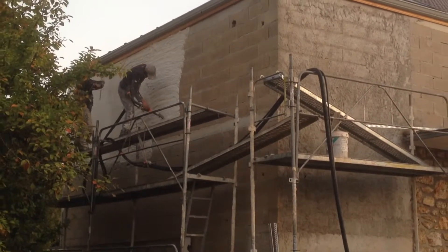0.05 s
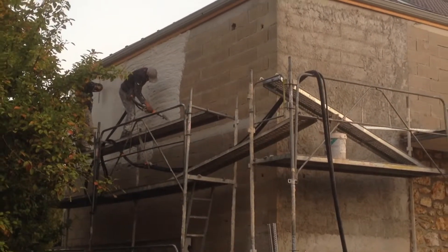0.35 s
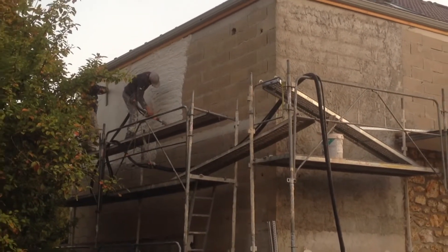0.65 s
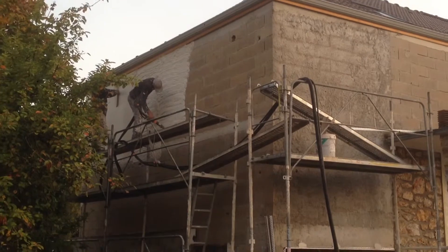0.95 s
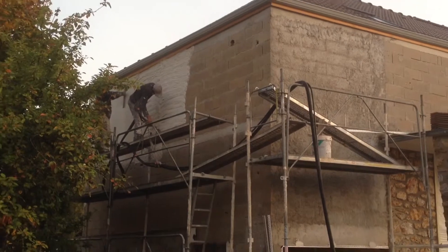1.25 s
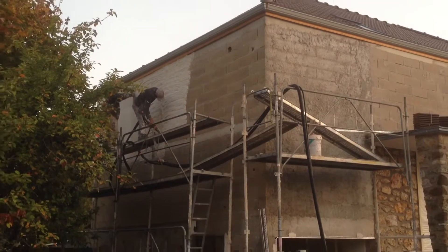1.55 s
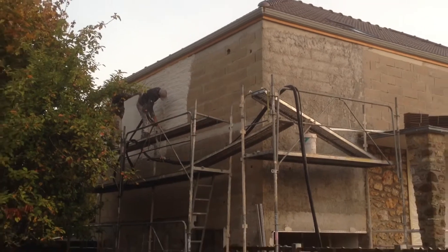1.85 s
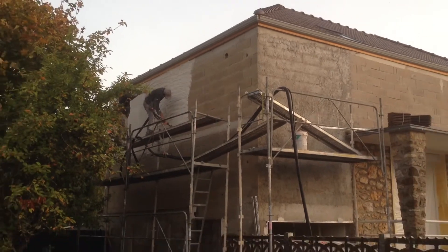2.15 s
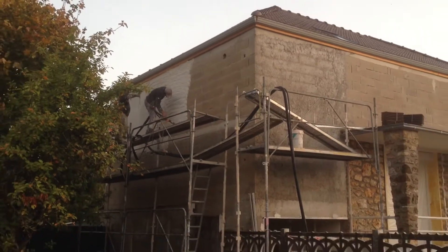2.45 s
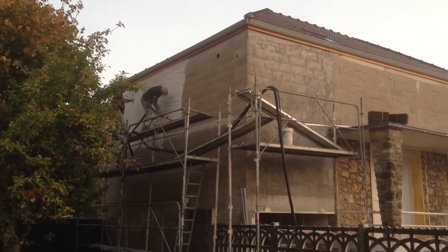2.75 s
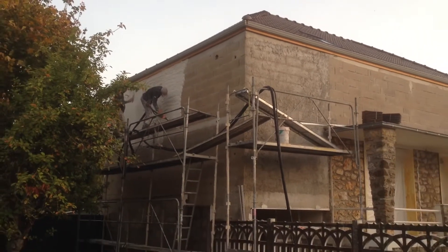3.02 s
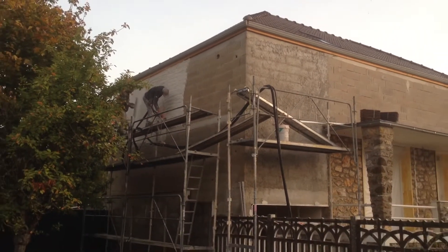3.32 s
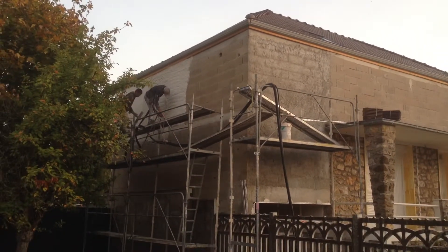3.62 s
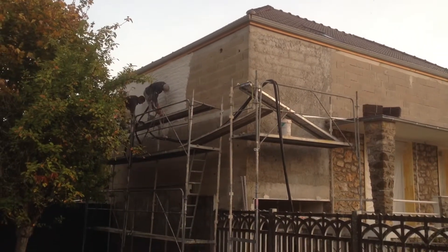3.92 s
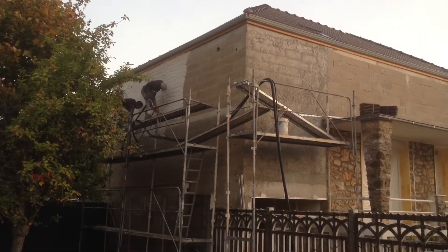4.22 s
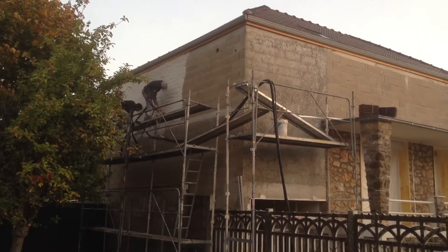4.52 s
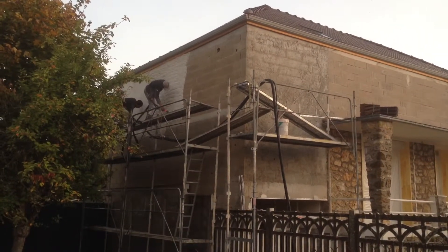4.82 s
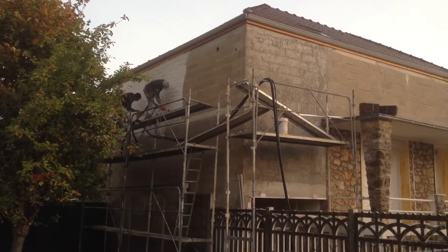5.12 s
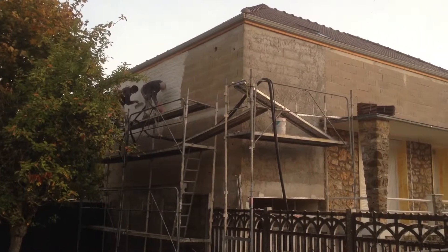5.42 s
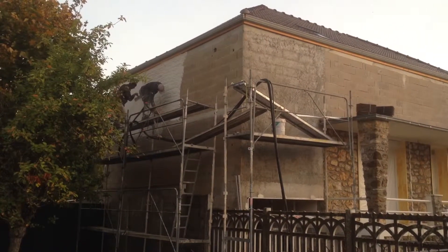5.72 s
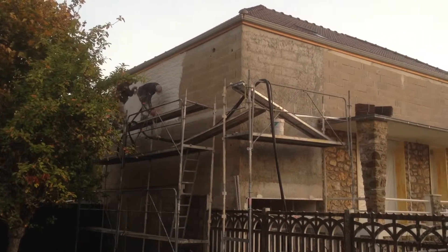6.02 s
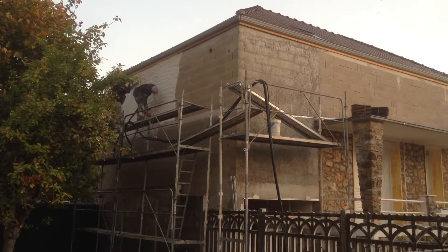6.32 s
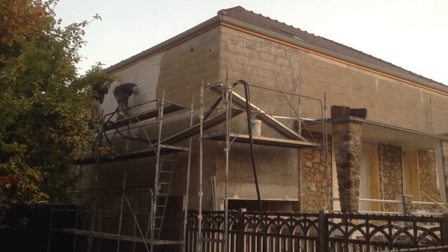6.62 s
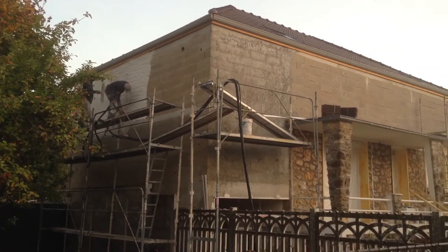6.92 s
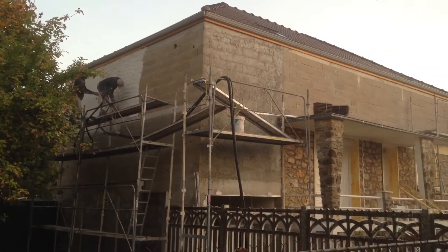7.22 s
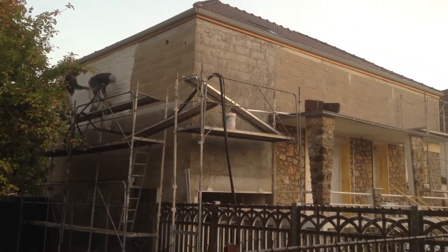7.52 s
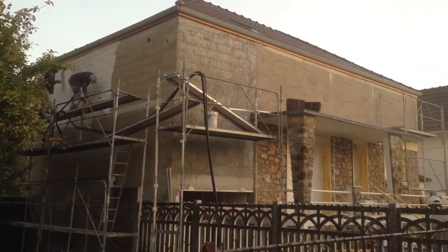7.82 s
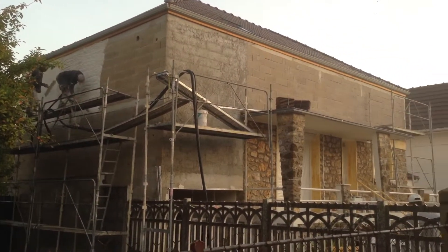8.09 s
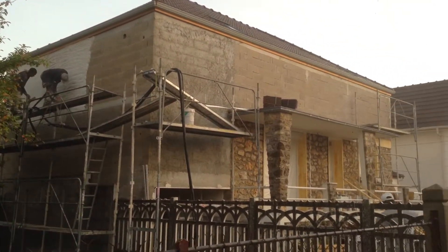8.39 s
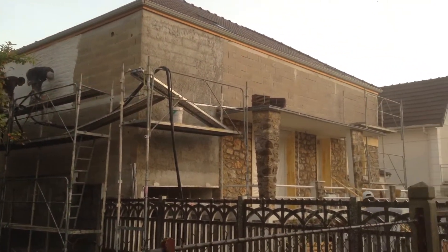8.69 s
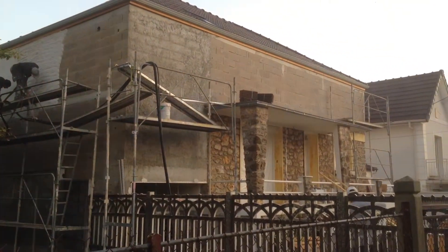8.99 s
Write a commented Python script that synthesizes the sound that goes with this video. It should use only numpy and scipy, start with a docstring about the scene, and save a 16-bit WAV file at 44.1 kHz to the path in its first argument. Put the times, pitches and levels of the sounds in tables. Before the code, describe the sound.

Outdoors beside a house being rendered, a pump's diesel engine throbs and hums steadily at a distance, its casing rattling lightly. Much quieter, a spray gun on the scaffold blows wet render onto the wall in five stretches of high hiss with short gaps. Two faint, quick tool scrapes come about two seconds apart midway, and a light airy hiss remains throughout.

```python
"""A three-cylinder diesel drives a render pump at a governed 2400 rpm, some way off on a building site.
Its intake thuds, its exhaust drones, its block clatters faintly, and the belt-driven pump and
compressor hum at their own speeds. Up on the scaffold a spray gun hisses along the wall in five
passes over a bed of airy treble, and a tool scrapes twice."""
import sys
import numpy as np
from scipy import signal
from scipy.fft import rfft, irfft, next_fast_len
from scipy.io import wavfile
from scipy.ndimage import map_coordinates

SR = 44100
rng = np.random.default_rng(int(sys.argv[2]) if len(sys.argv) > 2 else 0)


def transcribe(u):
    """Save the signal u as a 16-bit wav file named by the first command-line argument.

    u: samples, shape (n,) or (channels, n), limited to [-1, 1]; the rate is SR.
    q: integer samples, one column per channel.
    """
    v = np.clip(np.atleast_2d(u).T, -1, 1)
    q = np.round(v * 32767).astype(np.int16)
    wavfile.write(sys.argv[1], SR, q)


N = 403499
TIME = np.arange(N) / SR
CYLINDERS, GOVERNED_FIRING_HZ = 3, 60


def amp(db):
    """Decibels to gain."""
    return 10 ** (np.asarray(db) / 20)


def unit(x):
    """x at rms 1."""
    return x / np.sqrt(np.mean(x ** 2) + 1e-20)


def automation(points):
    """A fader curve through (time, level) points."""
    return np.interp(TIME, *np.transpose(points))


def wobble(rate):
    """A smooth random curve, rate knots a second."""
    coarse = np.arange(0, N + 64, 64)
    knots = rng.standard_normal(int(N * rate / SR) + 4)
    return np.interp(np.arange(N), coarse, map_coordinates(knots, [coarse * rate / SR]))


def filtered(x, response):
    """x through an EQ whose gain is response(hz)."""
    size = next_fast_len(N + SR // 2)
    return irfft(rfft(x, size) * response(np.fft.rfftfreq(size, 1 / SR)), size)[:N]


def noise(spectrum):
    """Noise of rms 1, coloured by (frequency, level) points on a log axis."""
    points_hz, db = np.transpose(spectrum)
    colour = lambda hz: amp(np.interp(np.log(hz + 1), np.log(points_hz + 1), db))
    return unit(filtered(rng.standard_normal(N), colour))


def band(centre_hz, half_width_hz):
    """Noise of rms 1 in one resonance, whose centre may move."""
    skirt = lambda hz: 1 / (1 + (hz / half_width_hz) ** 2)
    phase = 2 * np.pi * np.cumsum(centre_hz * np.ones(N)) / SR
    return unit(sum(filtered(rng.standard_normal(N), skirt) * wave(phase) for wave in (np.cos, np.sin)))


def tone(turns):
    """A sine of rms 1."""
    return np.sqrt(2) * np.cos(2 * np.pi * turns)


def throb(turns, depth_db):
    """A gain that swells once a turn."""
    return unit(amp(depth_db * np.cos(2 * np.pi * turns)))


def echoed(x, delay_s, gain, sway, count):
    """x plus reflections from nearby walls, at rms 1; the colour shifts as the paths slowly change."""
    delays = [delay_s * (k + rng.uniform(.7, 1.3)) * (1 + sway * wobble(.6)) for k in range(count)]
    return unit(x + gain * sum(np.interp(TIME - delay, TIME, x) for delay in delays))


# Intake thud (first two rows) and exhaust drone: multiple of the firing rate, base level/dB
FIRING_HARMONICS = [(1, -35.5), (2, -39.5), (3, -35.5), (4, -37.5), (5, -46.5), (6, -57), (7, -83),
                    (8, -55)]
# Swell of the silencer drone as the listener moves, taken about its mean: t/s, level/dB
DRONE_SWELL = [(0.2, -38.5), (2.53, -37), (2.94, -34.5), (8.78, -32.5), (9.0, -32.5)]


def intake_and_exhaust(firings, intake_lag=0.39, scatter_db=0.64, waver_db=0.5):
    """Each cylinder puffs through the silencer; part of a firing later the intake takes a deep gulp."""
    drone_db = automation(DRONE_SWELL)
    drone_db -= drone_db.mean()
    thud_db = -0.37 * drone_db
    # the drone grows with its octave; the thud recedes and trades level with its own octave
    shift_db = {1: thud_db, 2: -0.89 * thud_db, 3: drone_db, 6: drone_db, 8: thud_db}
    partials = [(k, amp(db + shift_db.get(k, 0) + waver_db * wobble(7.2))) for k, db in FIRING_HARMONICS]
    gulps = sum(gain * tone(k * (firings - intake_lag)) for k, gain in partials[:2])
    puffs = sum(gain * tone(k * firings) for k, gain in partials[2:])
    burn_strength = amp(scatter_db * wobble(45))  # no two burns are quite equal
    return puffs * burn_strength - gulps  # suction lowers the pressure


# Tones of unequal cylinders, valves and gears: multiple of the four-stroke cycle rate, level/dB
BLOCK_TONES = [(8, -56.5), (10, -49), (13, -58), (16, -57), (17, -61.5), (34, -73.5), (36, -75), (48, -76),
               (55, -73), (60, -74), (63, -74), (65, -73), (68, -72.5), (69, -76), (75, -74), (78, -72.5),
               (81, -78.5), (93, -81.5), (96, -76), (106, -82), (122, -82.5)]


def engine_block(firings, waver_db=2, slack_turns=0.072):
    """Whatever repeats once in two crank turns sings on multiples of a third of the firing rate."""
    cycles = firings / CYLINDERS
    return sum(amp(db + waver_db * wobble(2.96))
               * tone(k * cycles + rng.random() + slack_turns * wobble(4)) for k, db in BLOCK_TONES)


# Pump and compressor hum at the governed speed: f/Hz, level/dB
PUMP_TONES = [(70.6, -49), (82.1, -54.5), (335.6, -68), (503.8, -66)]


def pump_and_compressor(firings, waver_db=2.5, slip_turns=0.065):
    """Belt-driven parts follow the engine's speed and beat against its harmonics."""
    engine_time = firings / GOVERNED_FIRING_HZ
    return sum(amp(db + waver_db * wobble(2.7))
               * tone(hz * engine_time + rng.random() + slip_turns * wobble(3.3))
               for hz, db in PUMP_TONES)


# Low-end colour of the gas rumble: f/Hz, relative level/dB
RUMBLE_EQ = [(15, -21), (35, -1.5), (60, -14), (88, 4), (130, -1.5), (170, 0), (220, -7), (265, -3),
             (292, -1), (320, -5), (375, -11.5), (440, -32), (700, -43.5)]
# Midrange colour of the rattling casing: f/Hz, relative level/dB
CLATTER_EQ = [(200, -25), (400, 1.5), (500, 1.5), (570, 0.5), (700, 0), (1000, -3.5), (1300, -4.5),
              (1700, -8), (1860, -7), (2050, -11.5), (2450, -13.5), (3000, -18), (5000, -21), (15000, -48)]


def rumble_and_clatter(firings, rumble_db=-46, clatter_db=-53.5):
    """Gas rumbles with every puff; the casing rattles with the firings and with the valve cycle."""
    rumble = amp(rumble_db) * noise(RUMBLE_EQ) * throb(firings, depth_db=-1.0)
    rattle = throb(firings, depth_db=0.7) * throb(firings / CYLINDERS, depth_db=0.73)
    flicker = amp(0.65 * wobble(22) + 0.11 * wobble(2.99))
    casing = echoed(noise(CLATTER_EQ), delay_s=.005, gain=0.12, sway=0.0092, count=4)
    return rumble + amp(clatter_db) * casing * rattle * flicker


# Passes of the gun: start t/s, end t/s, level/dB before surge and trim, f/Hz the hiss sinks toward
GUN_PASSES = [(-0.4, 0.86, -68.5, 3835), (0.78, 3.3, -66.8, 3998), (3.78, 5.66, -66, 3660),
              (6.07, 8.25, -69.3, 4340), (8.35, 9.4, -71, 4500)]


def spray_gun(attack_s=0.22, release_s=0.17, surge_db=4.5, surge_s=0.29, opening_hz=4750, glide_s=0.6,
              trim_db=-2.5, sputter_db=1.4, whistle_hz=4580, sag_hz_per_s=70):
    """Air blows wet render from the nozzle; each pass opens with a bright surge, then settles."""
    passes = np.array(GUN_PASSES)
    current = np.maximum(np.searchsorted(passes[:, 0], TIME) - 1, 0)
    start, end, db, settled_hz = passes[current].T
    age = np.maximum(TIME - start, 0)
    valve = np.clip(age / attack_s, 0, 1) * np.clip((end - TIME) / release_s, 0, 1)
    surge = amp(surge_db * np.exp(-age / surge_s))  # pressure stored in the hose
    centre_hz = settled_hz + (opening_hz - settled_hz) * np.exp(-age / glide_s)
    hiss = echoed(band(centre_hz, half_width_hz=860), delay_s=.002, gain=0.55, sway=0.043, count=2)
    whistle = amp(-7.5) * band(whistle_hz - sag_hz_per_s * age, half_width_hz=70)
    return valve * surge * amp(db + trim_db + sputter_db * wobble(25)) * (hiss + whistle)


# Colour of the airy treble: f/Hz, relative level/dB
AIR_EQ = [(500, -26), (2400, 0), (3100, 2), (3700, 4), (5200, 4), (6500, -2), (8000, -1.5), (10000, -4.5),
          (14000, -5.5), (15300, -8.5)]
# Fader ride of the airy treble: t/s, level/dB
AIR_FADER = [(1, -65.1), (1.5, -64.2), (4, -64.2), (4.6, -65), (6.5, -66), (9.1, -65)]


def airy_treble(flutter_db=0.65):
    """A bright, lightly fluttering bed of hiss that carries on between the passes."""
    return amp(automation(AIR_FADER) + flutter_db * wobble(20)) * noise(AIR_EQ)


# Tool strokes: start t/s, level/dB at the crest, centre f/Hz, length t/s (twice the rise time)
TOOL_STROKES = [(3.56, -56.5, 2100, 0.02), (5.577, -51.5, 1790, 0.03)]


def tool_scrapes():
    """Two brief strokes of a tool on the wall, each swelling and dying away."""
    strokes = np.zeros(N)
    for start, db, centre_hz, length in TOOL_STROKES:
        rise = np.maximum(TIME - start, 0) / (length / 2)
        strokes += amp(db) * rise * np.exp(1 - rise) * band(centre_hz, half_width_hz=300)
    return strokes


def scene(start_hz=60.48, loaded_hz=59.76, settle_s=3.7):
    """The diesel, sagging a little under the pump's load, mixed in mono with the work on the wall."""
    firing_hz = loaded_hz + (start_hz - loaded_hz) * np.exp(-TIME / settle_s)
    firings = np.cumsum(firing_hz + 0.083 * wobble(12)) / SR  # the governor hunts a little
    machine = intake_and_exhaust(firings) + engine_block(firings)
    machine += pump_and_compressor(firings) + rumble_and_clatter(firings)
    return (machine + spray_gun() + airy_treble() + tool_scrapes())[None]


def record(dry, fade_s=0.008, top_hz=15300):
    """A quick fade at each end and a brick-wall high cut."""
    fades = signal.windows.tukey(N, 2 * fade_s * SR / N)
    return np.array([filtered(channel * fades, lambda hz: hz < top_hz) for channel in dry])


dry = scene()
out = record(dry)
transcribe(out)
```